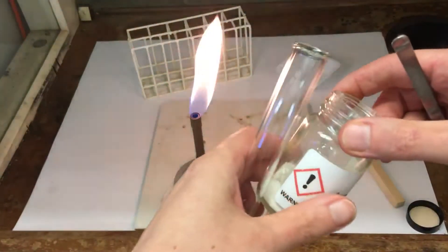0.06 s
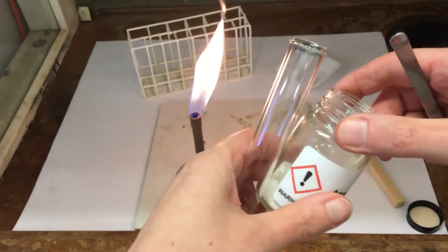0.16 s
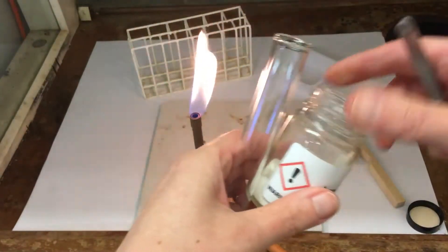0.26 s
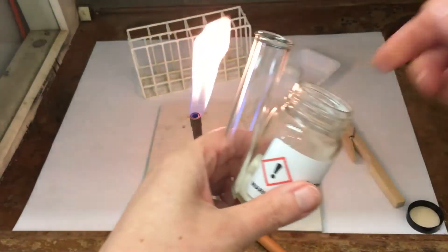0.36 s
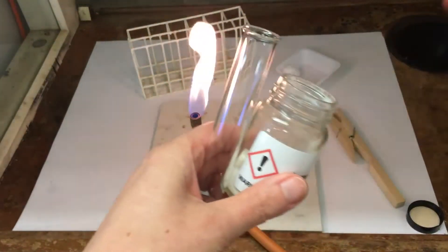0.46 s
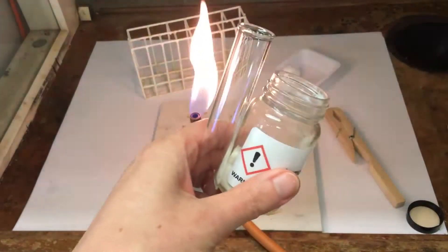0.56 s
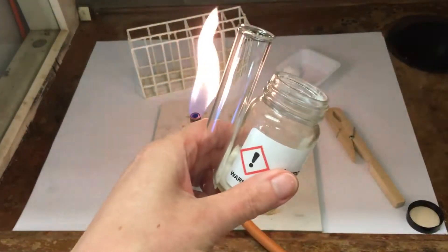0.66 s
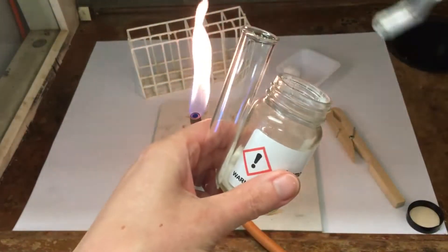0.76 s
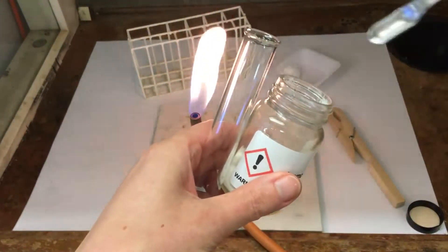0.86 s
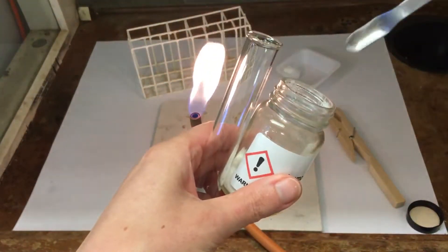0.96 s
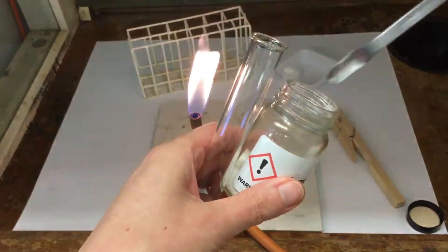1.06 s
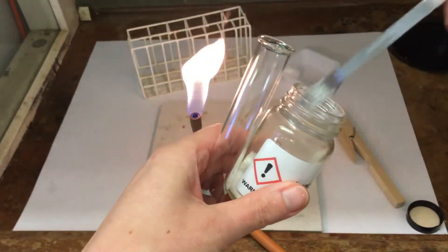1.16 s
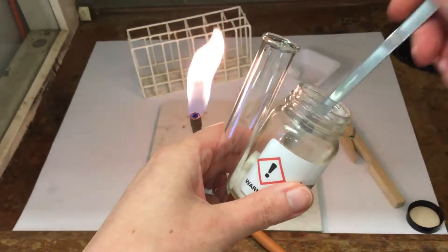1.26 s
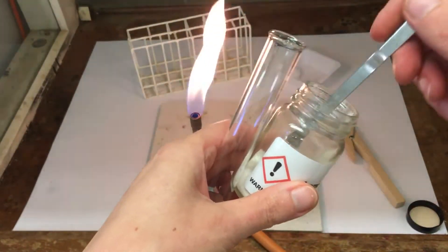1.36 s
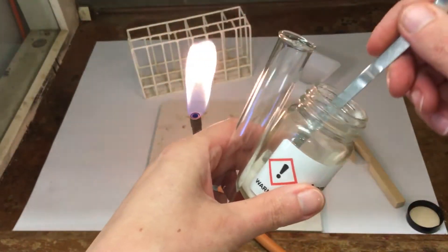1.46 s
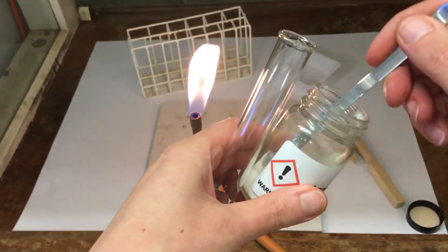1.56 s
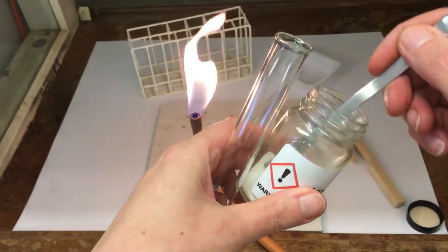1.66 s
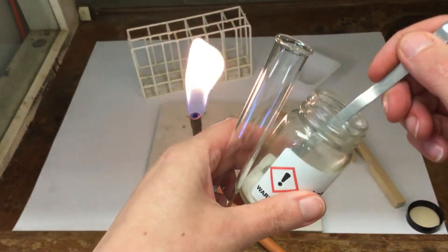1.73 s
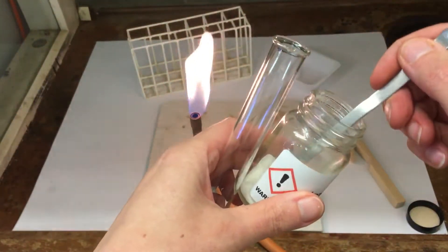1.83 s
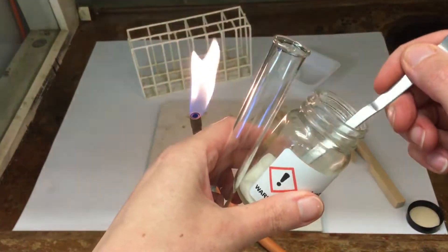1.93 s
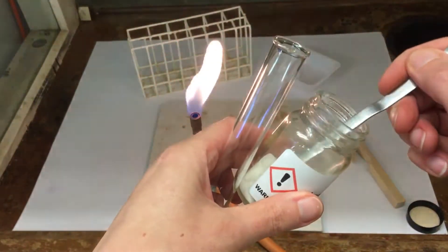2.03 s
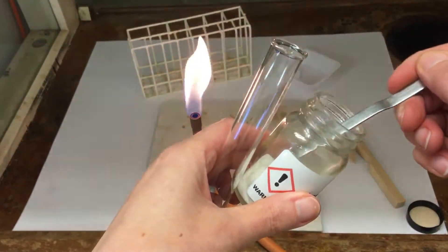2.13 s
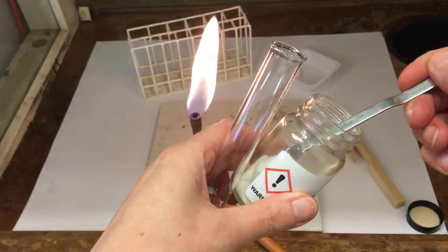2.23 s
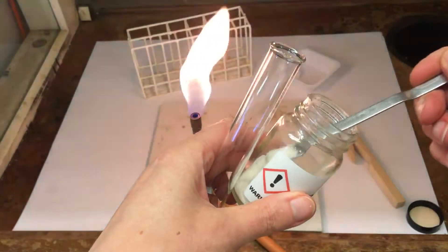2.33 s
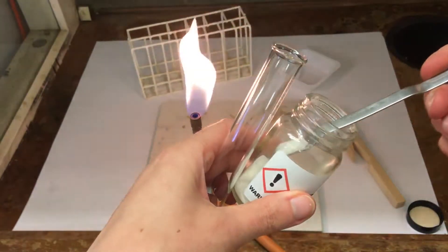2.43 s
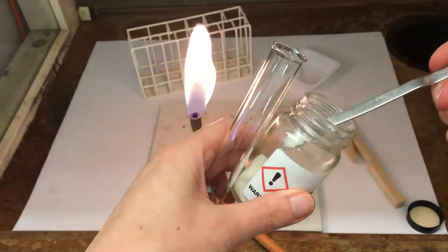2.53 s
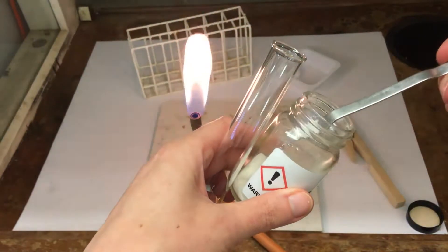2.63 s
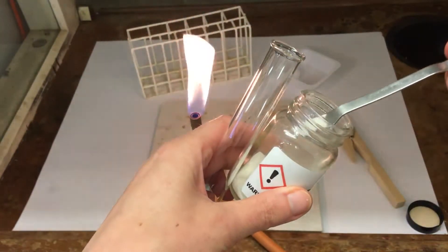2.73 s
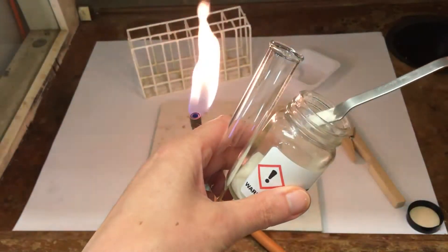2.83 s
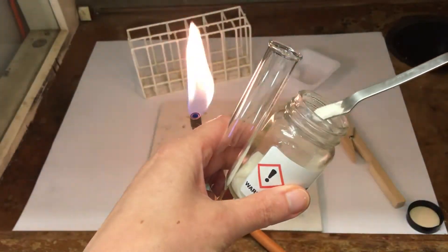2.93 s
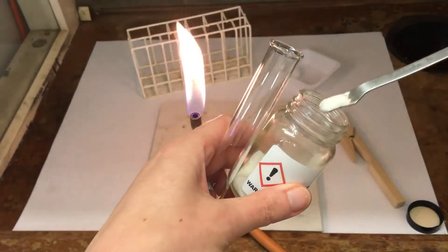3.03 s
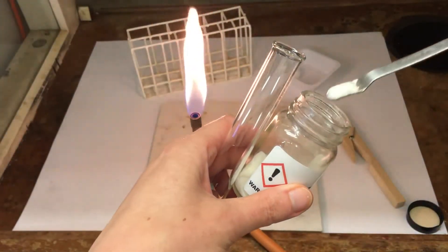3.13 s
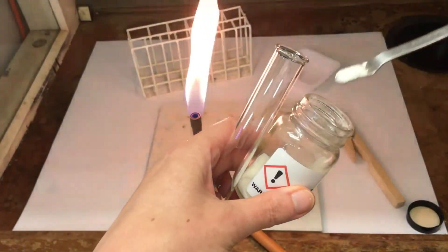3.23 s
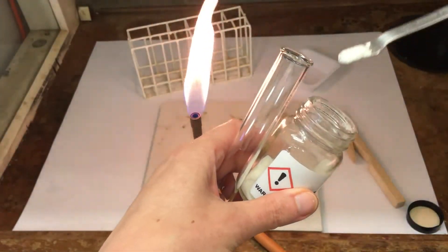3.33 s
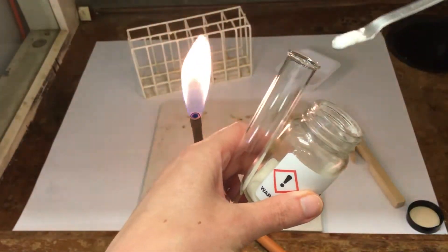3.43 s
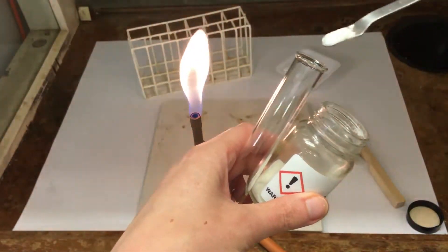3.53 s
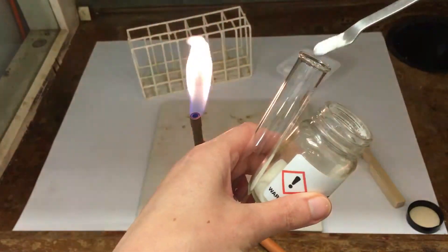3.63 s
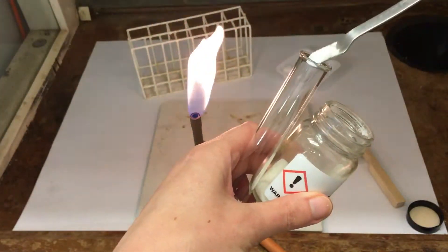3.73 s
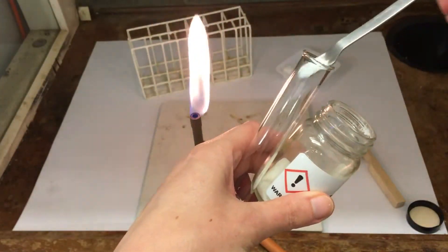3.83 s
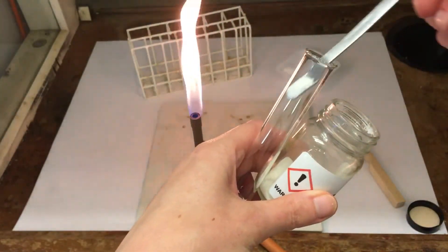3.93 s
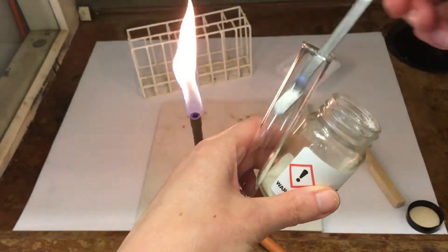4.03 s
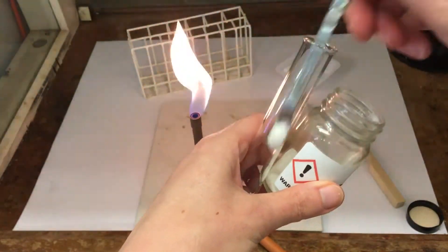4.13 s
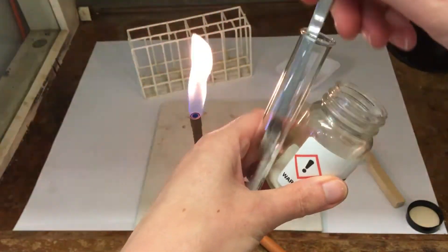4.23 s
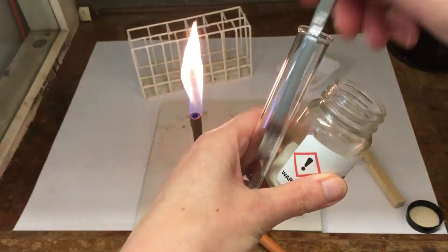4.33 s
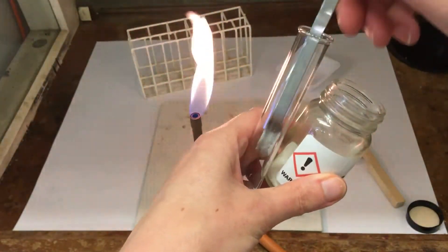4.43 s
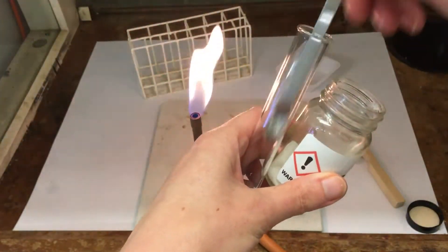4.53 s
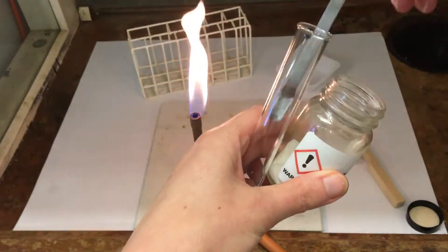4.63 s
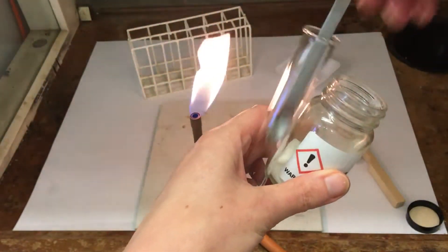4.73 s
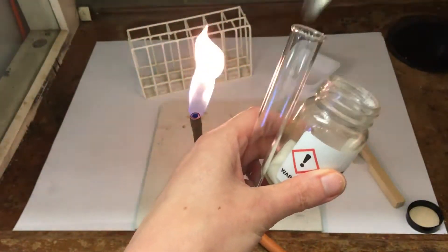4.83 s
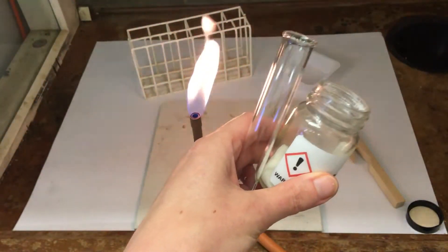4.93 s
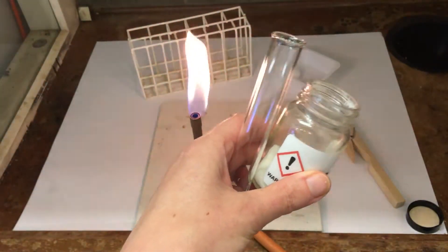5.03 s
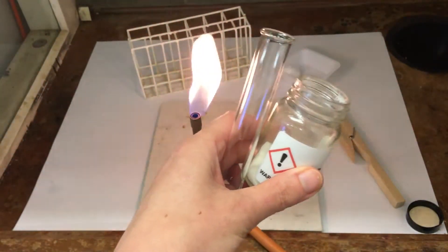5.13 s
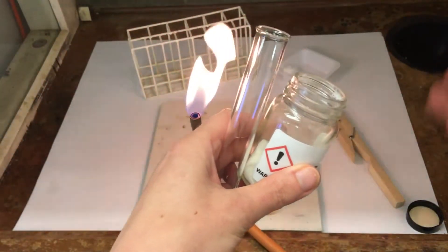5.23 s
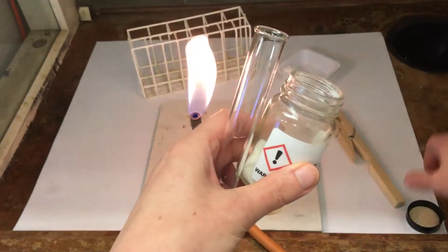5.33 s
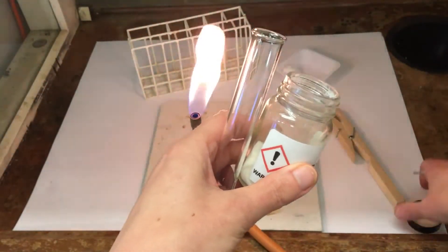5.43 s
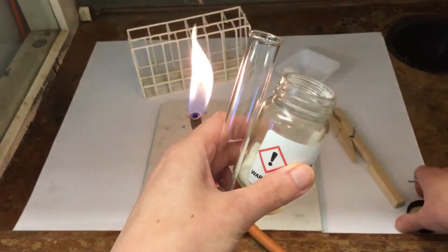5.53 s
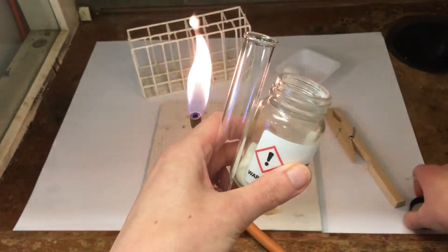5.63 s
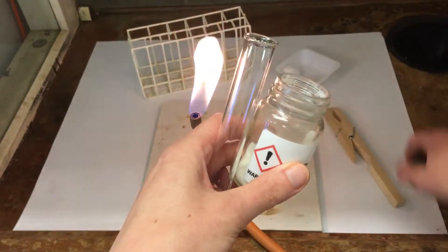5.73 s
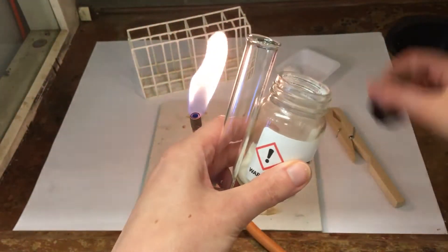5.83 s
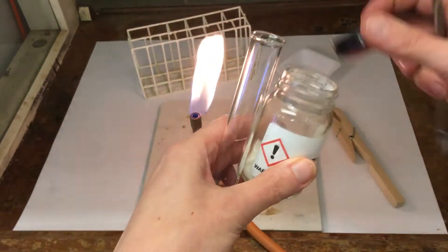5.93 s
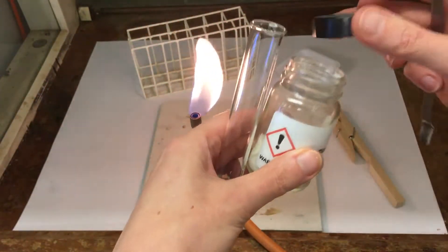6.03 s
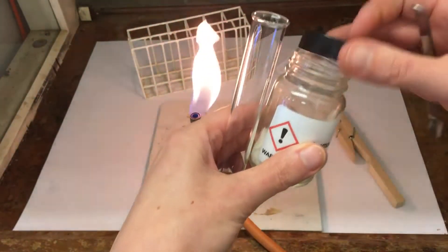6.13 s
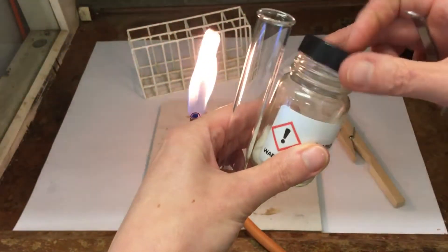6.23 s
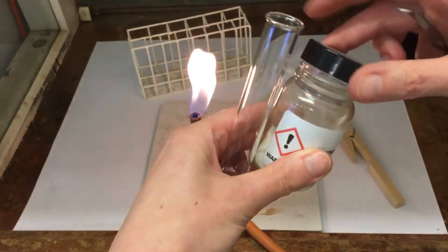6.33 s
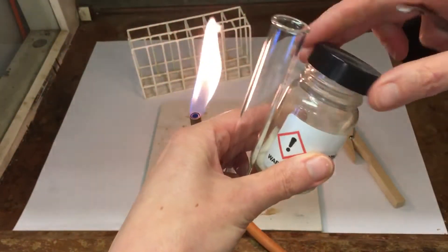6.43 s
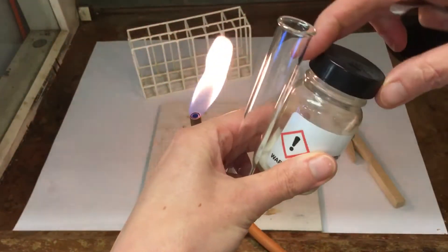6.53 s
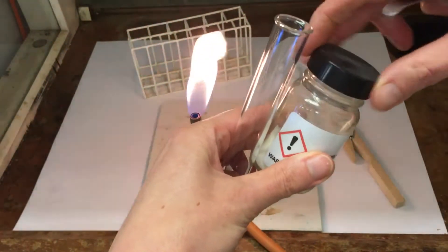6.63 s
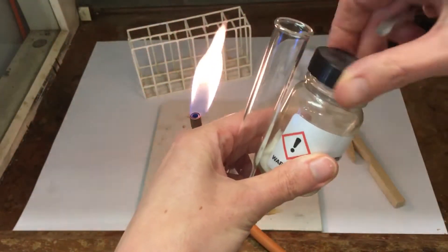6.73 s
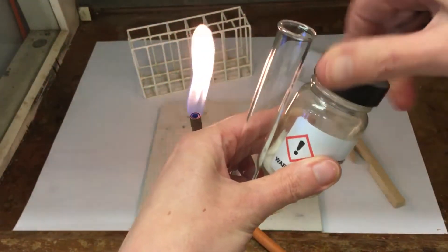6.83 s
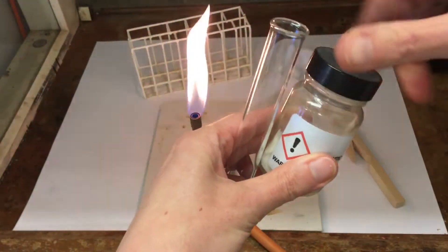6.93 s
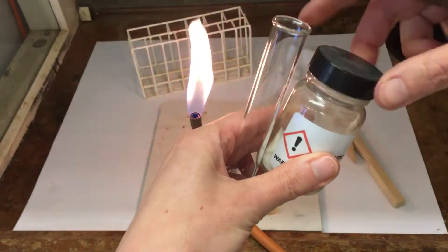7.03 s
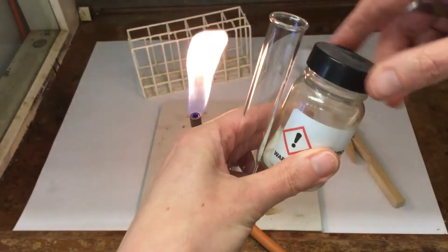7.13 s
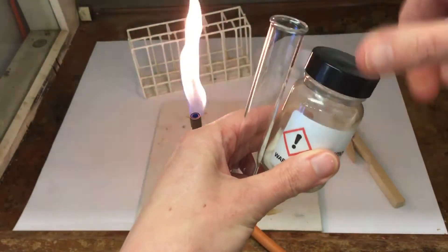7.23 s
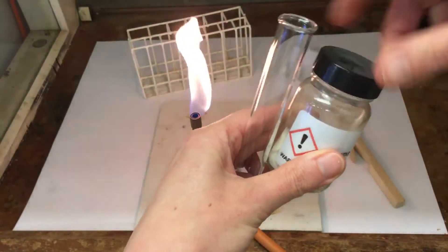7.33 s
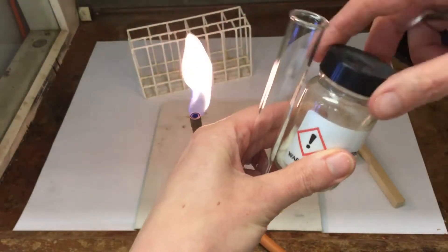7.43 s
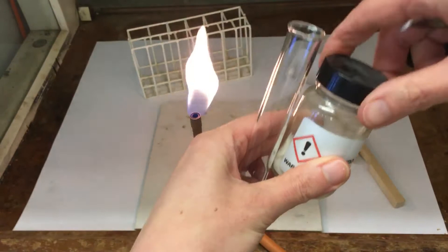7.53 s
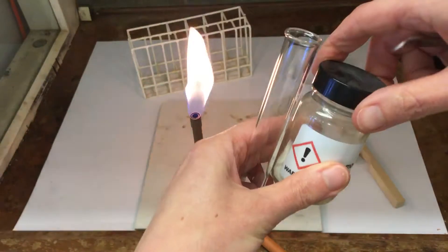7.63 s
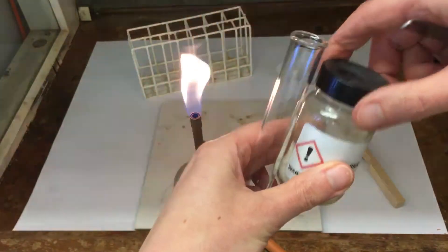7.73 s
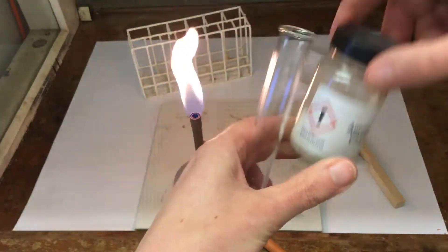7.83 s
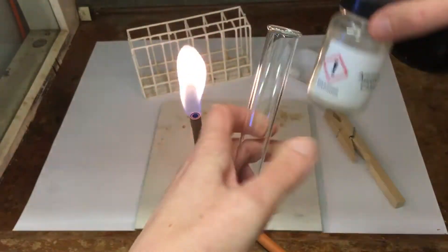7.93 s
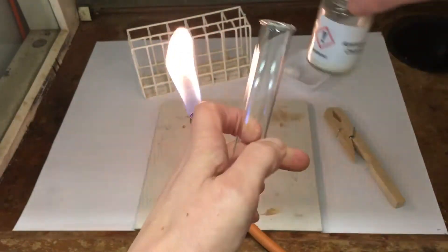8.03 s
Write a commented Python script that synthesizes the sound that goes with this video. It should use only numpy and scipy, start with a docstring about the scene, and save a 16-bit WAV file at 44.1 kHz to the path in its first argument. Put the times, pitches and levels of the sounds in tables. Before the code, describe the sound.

Close by, a metal spatula clinks once on glass, then scratches softly through powder in a jar. A pause leads to the loudest part, about a second of quick, ringing taps inside a glass test tube. Afterwards a plastic lid lands on the jar with a clack, then clicks and rasps as it turns. The low rumble and hum of a laboratory extractor fan runs underneath throughout.

```python
"""Spatula, jar and lab fan

A fume-cupboard fan rumbles and hums in a laboratory. After one light clink, a steel spatula scrapes
powder in a glass jar, then taps it off inside a hand-held boiling tube, making the glass ring.
A plastic lid is picked up and screwed onto the jar, knocking and rasping as it turns."""
import sys
import numpy as np
from scipy import signal
from scipy.fft import rfft, irfft, next_fast_len
from scipy.io import wavfile

SR = 44100
rng = np.random.default_rng(int(sys.argv[2]) if len(sys.argv) > 2 else 0)


def pcm_store(signal):
    """Save signal as 16-bit PCM."""
    levels = np.round(np.clip(np.atleast_2d(signal), -1, 1) * 32767)
    wavfile.write(sys.argv[1], SR, levels.astype(np.int16).T)


N = 355754
T = np.arange(N) / SR
SHORT_T = T[:SR // 3]   # the clock for one short sound [s]


def amp(db):
    """Turn decibels into a number to multiply by."""
    return 10 ** (np.asarray(db) / 20)


def rms_one(x):
    """Scale the average strength (rms) to 1."""
    return x / np.sqrt(np.mean(x ** 2) + 1e-20)


def start_one(sound):
    """Scale the average strength of the first 10 ms to 1."""
    return sound / np.sqrt(np.mean(sound[:SR // 100] ** 2))


def peak_one(sound):
    return sound / np.abs(sound).max()


def add(out, start_s, sound):
    at = round(start_s * SR)
    out[at:at + len(sound)] += sound[:N - at]


def band(x, low_hz, high_hz):
    """Turn down everything outside a range of pitches."""
    edges = [low_hz, min(high_hz, .45 * SR)]
    return signal.sosfilt(signal.butter(2, edges, "band", fs=SR, output="sos"), x)


def coloured(x, outline, bumps):
    """Shape the bass and treble with a broad outline plus rounded peaks and dips."""
    size = next_fast_len(N)
    hz = np.arange(1, size // 2 + 2) * SR / size
    outline_hz, outline_db = np.transpose(outline)
    db = np.interp(np.log(hz), np.log(outline_hz), outline_db)
    for centre_hz, width_hz, bump_db in bumps:
        db += bump_db * np.exp(-.5 * ((hz - centre_hz) / (.5 * width_hz)) ** 2)
    return irfft(rfft(x, size) * amp(db), size)[:N]


def waver(per_s):
    """A slow random drift, about 1 in size."""
    r = np.exp(-2 * np.pi * per_s / SR)
    return rms_one(signal.lfilter([1], [1, -2 * r, r * r], rng.standard_normal(N + SR))[SR:])


def strike(notes):
    """One hit rings an object's own notes, a bit differently each time. Each fades 60 dB in t60 s."""
    hz, db, t60 = np.transpose(notes)[:, :, None]
    strength, phase, detune = rng.standard_normal((3, len(notes), 1))
    onset = np.minimum(SHORT_T / .0004, 1)   # contact lasts 0.4 ms
    height = amp(db + 3 * strength - 60 * SHORT_T / t60) * onset
    gripped_hz = hz * (1 + .004 * detune)   # the grip shifts each pitch slightly
    return np.sum(height * np.sin(2 * np.pi * gripped_hz * SHORT_T + .6 * phase), axis=0)


def crack(low_hz, high_hz, t60):
    """A quick burst of noise as two things touch."""
    return band(rng.standard_normal(len(SHORT_T)) * amp(-60 * SHORT_T / t60), low_hz, high_hz)


def grains(per_s, spread_db):
    """Random clicks of uneven size."""
    sizes = amp(spread_db * np.minimum(rng.exponential(1, N), 5)) * rng.choice([-1, 1], N)
    return sizes * (rng.random(N) < per_s / SR)


def ring(clicks, notes):
    """Every click sets an object's own notes ringing."""
    out = 0
    for hz, db, t60 in notes:
        r, w = amp(-60 / (t60 * SR)), 2 * np.pi * hz / SR
        out = out + amp(db) * signal.lfilter([0, np.sin(w)], [1, -2 * r * np.cos(w), r * r], clicks + 1e-18)
    return out


def strokes(rows, column, rise, fall):
    """Each stroke rises to the level in the given column, holds, then falls. Slopes are in dB/s."""
    db = np.full(N, -200.)
    for row in rows:
        before_s = np.maximum(row[0] - T, 0)
        after_s = np.maximum(T - row[0] - abs(row[1]), 0)
        db = np.maximum(db, row[column] - rise * before_s - fall * after_s)
    return amp(db)


# The rush of air, from bass to treble: (pitch [Hz], level [dB per Hz])
AIR_OUTLINE = [(28, -84), (37, -53), (70, -49), (220, -50.5), (238, -64), (760, -70), (830, -79.5),
               (2200, -89), (2900, -95), (4200, -95), (5000, -100), (10300, -111), (14700, -116),
               (15650, -104), (15850, -127)]
# Pitches the duct and cupboard boost or cancel, plus a shallow dip near 4.9 kHz: (pitch [Hz], width [Hz], boost
# [dB])
DUCT_BUMPS = [(41.5, 5, 10), (55, 6, -5), (156, 14, -10), (175, 10, 3), (206, 14, 5), (281, 9, -7),
              (336, 26, 7), (396, 18, -13), (418, 14, 4), (450, 8, -13), (483, 10, -5), (545, 50, 4),
              (615, 45, -7), (650, 8, -6), (672, 22, 4), (693, 10, -6), (720, 25, 3), (800, 20, -8),
              (858, 22, -11), (908, 16, -6), (990, 50, 8), (1410, 70, -5), (1640, 90, 8.5), (1760, 40, -5),
              (1845, 40, -4), (4900, 300, -3)]
def fan_air():
    """Rushing air, shaped by waves bouncing inside the duct and cupboard."""
    return coloured(rng.standard_normal(N), AIR_OUTLINE, DUCT_BUMPS) * np.sqrt(SR / 4)


# Chance swells and dips in the low rumble near 97 Hz: (time [s], level [dB])
CHANCE_SWELLS = [(0.0, -18.5), (0.13, -25), (0.45, -27), (0.52, -37), (0.58, -21), (0.76, -29),
                 (1.12, -26.5), (1.17, -36), (1.37, -23), (2.47, -28.5), (2.54, -18), (2.65, -31),
                 (3.23, -22.5), (3.28, -34.5), (3.68, -23), (3.89, -36), (4.54, -22), (4.6, -39.5),
                 (4.76, -23.5), (5.57, -33.5), (5.66, -21), (5.75, -29), (7.26, -24.5), (7.73, -30),
                 (7.8, -20.5), (8.07, -34)]
def low_rumble():
    """The strongest of the bouncing waves is a low rumble that swells and dips by chance."""
    rumble_hz, wander_hz = 97.5, 8
    narrow = band(rng.standard_normal(N + SR), rumble_hz - wander_hz, rumble_hz + wander_hz)
    phase = np.angle(signal.hilbert(narrow, next_fast_len(N + SR)))
    tone = np.cos(phase)[SR:SR + N]   # wandering pitch, even strength
    level_db = np.interp(T, *np.transpose(CHANCE_SWELLS)) + 3 * waver(per_s=8)
    return band(tone, 78, 110) * np.sqrt(2) * amp(level_db)


# Motor tones; 22 per turn is the blade or slot rate:
# (cycles per turn [count], cycles per magnetic pull [count], level [dB])
MOTOR_TONES = [(1, 0, -64), (5, 0, -51), (6, 0, -49), (7, 0, -37), (11, 0, -61), (12, 0, -58), (18, 0, -66),
               (0, 2, -32.5), (0, 3, -64), (0, 5, -62), (0, 6, -71), (0, 7, -68), (0, 10, -65),
               (22, 0, -47), (22, 1, -58), (22, 2, -61), (22, 4, -73)]
def motor_hum():
    """The spinning shaft and the pulsing magnetic pull make steady tones."""
    shaft_hz, magnet_hz = 24.615, 100.17
    out = np.zeros(N)
    for per_turn, per_pull, db in MOTOR_TONES:
        hz = per_turn * shaft_hz + per_pull * magnet_hz
        out += amp(db) * np.sqrt(2) * np.sin(2 * np.pi * hz * T + rng.uniform(0, 2 * np.pi))
    return out


# Notes of the tube wall, split and muffled by the hand: (pitch [Hz], level [dB], fade time [s])
WALL_NOTES = [(4580, 0, .036), (4655, -3, .034), (4790, -10, .02), (5350, -7, .006), (4610, -23, .17),
              (4520, -24, .1)]
# The tube's high notes: (pitch [Hz], level [dB], fade time [s])
HIGH_NOTES = [(11090, -7, .05), (11240, 0, .06), (11400, -2, .05), (11500, 0, .07), (11600, -4, .09),
              (11880, -6, .05), (12200, -9, .04), (12400, -5, .05), (12600, -6, .07), (12950, -7, .04),
              (13590, -9, .035), (14000, -8, .035), (14200, -6, .045), (14400, -7, .04), (14750, -11, .03)]
# Glass or steel hitting glass: (time [s], wall level [dB], high notes level [dB], crack level [dB])
TUBE_TAPS = [(0.0262, -27, -48.5, -52), (3.7761, -21, -45, -43), (3.7881, -26, -56, -62),
             (3.812, -34.5, -57, -66), (3.8312, -40, -61, -73), (3.899, -51, -78, -84),
             (3.9165, -40, -65, -72), (3.9814, -66, -70, -86), (3.9994, -63, -70, -86),
             (4.0801, -18.5, -35.5, -32.5), (4.0956, -30, -65, -47), (4.1266, -18.5, -36, -33),
             (4.1864, -33, -56.5, -65), (4.2017, -30.5, -55, -56), (4.2343, -20, -42, -36.5),
             (4.2767, -40, -73, -62), (4.2984, -28.5, -48, -53), (4.3012, -27, -62.5, -46),
             (4.324, -16, -25, -35), (4.373, -11, -21, -31), (4.434, -10.5, -22.5, -27),
             (4.4925, -9.5, -27, -44), (4.512, -16.5, -41.5, -31.5), (4.569, -20, -30.5, -33),
             (4.5766, -18.5, -24.5, -35), (4.6203, -14, -30, -41), (4.635, -19, -22.5, -34),
             (4.6578, -19, -54.5, -45.5), (4.6848, -30, -50, -55.5), (4.6949, -22.5, -41, -49),
             (4.711, -18.5, -36.5, -42), (4.74, -40, -42, -51)]
def tube_taps():
    """Each tap rings the glass tube and adds a steel clank and a bright crack."""
    out = np.zeros(N)
    settle = amp(-60 * SHORT_T / .03) + amp(-5)   # the resting spatula quickly quiets the high notes
    for start_s, wall_db, high_db, crack_db in TUBE_TAPS:
        pitch, strength = rng.standard_normal(2)
        clank_hz = 3400 * 2 ** (.3 * pitch)
        clank_db = wall_db - 26.5 + 2.5 * strength
        add(out, start_s, amp(wall_db) * peak_one(strike(WALL_NOTES)))
        add(out, start_s, amp(high_db) * start_one(strike(HIGH_NOTES) * settle))
        add(out, start_s, amp(clank_db) * start_one(crack(.44 * clank_hz, 1.27 * clank_hz, t60=.031)))
        add(out, start_s, amp(crack_db) * start_one(crack(5200, 16500, t60=.016)))
        add(out, start_s, amp(crack_db - 6.5) * start_one(crack(7000, 16500, t60=.004)))   # first touch
    return out


# The glass jar's notes: (pitch [Hz], level [dB], fade time [s])
JAR_NOTES = [(7580, -4, .05), (7690, -5, .05), (7775, 0, .07), (8900, -15, .03), (9800, -11, .04),
             (10150, -12, .04), (11500, -8, .05), (11800, -9, .05), (12400, -12, .05), (14100, -13, .04)]
# The spatula blade's notes: (pitch [Hz], level [dB], fade time [s])
BLADE_NOTES = [(2270, 0, 0.0098), (2450, -5, 0.026), (2580, -2, 0.05)]
# Scrapes through the powder: (time [s], hold [s], jar level [dB], blade level [dB])
SCRAPES = [(2.01, .003, -57, -53), (2.042, .003, -56.5, -59), (2.1, .003, -48.5, -47.5),
           (2.13, 0.081, -65, -58.5), (2.236, .003, -63, -67), (2.286, .04, -73, -64)]
# The spatula tip catching on the jar: (time [s], level [dB])
TIP_CATCHES = [(1.8177, -43.5), (1.9989, -47), (2.0318, -51), (2.0707, -50), (2.0837, -52), (2.0956, -51),
               (2.149, -41.5), (2.1834, -46), (2.2318, -58), (2.2867, -66)]
def scoop():
    """Grinding grains ring the jar and the blade, and the tip clicks where it catches."""
    muffle_hz = 10400   # powder softens the contact with the jar
    grit = grains(2000, spread_db=-1.5)
    on_jar = strokes(SCRAPES, column=2, rise=601, fall=550)
    on_blade = strokes(SCRAPES, column=3, rise=601, fall=550)
    out = rms_one(ring(band(grit, 3000, muffle_hz), JAR_NOTES)) * on_jar
    out += rms_one(ring(grit, BLADE_NOTES)) * on_blade
    out += amp(-19) * rms_one(band(grit, 9000, 17000)) * on_jar   # powder hiss
    for start_s, db in TIP_CATCHES:
        clink = peak_one(band(strike(JAR_NOTES), 3000, muffle_hz))
        click = peak_one(crack(6500, 15500, t60=.012))
        add(out, start_s, amp(db) * peak_one(clink + .42 * click))
    return out


# Light touches on the bench: (time [s], hold [s], level [dB])
BENCH_BRUSHES = [(5.506, 0.055, -61), (5.848, .005, -68)]
def bench_brush():
    """Fingers and lid brush the bench with a faint hiss."""
    hiss = rms_one(band(grains(9000, spread_db=3), 5000, 20000))
    return hiss * strokes(BENCH_BRUSHES, column=2, rise=503.5, fall=395)


# The plastic lid's notes: (pitch [Hz], level [dB], fade time [s])
LID_NOTES = [(1300, -3, .015), (1700, -2, .02), (2150, 0, .03), (2750, -2, .018), (3250, -1, .022),
             (4100, -4, .014), (5400, -6, .01), (6250, -4, .016)]
# Lid knocks: (time [s], level [dB], ring pitch [Hz], tick [dB], hollow pitch [Hz], hollow level [dB])
LID_KNOCKS = [(6.0647, -16, 5600, -60, 1020, -35), (6.1137, -37, 2060, -42.5, 680, -32),
              (6.1971, -37.5, 2680, -54, 687, -37.5), (6.4033, -41, 6350, -38, 630, -34),
              (6.4148, -29, 4330, -42, 600, -42), (6.4368, -33, 4260, -52, 1580, -42.5),
              (6.572, -41, 2130, -58, 654, -44), (6.607, -44, 2000, -54, 1690, -43.5),
              (6.6147, -34.5, 3670, -62, 640, -58), (6.6788, -50, 2040, -65, 600, -60),
              (6.6947, -34, 2220, -51, 660, -54), (6.732, -40, 2940, -68, 630, -68),
              (6.8522, -34, 6060, -49, 760, -45), (6.9968, -31, 2120, -46, 1060, -49),
              (7.004, -44, 6400, -31.5, 1310, -36.5), (7.0244, -38, 2600, -55, 600, -47),
              (7.048, -29.5, 3630, -41.5, 670, -60), (7.114, -30, 2380, -45, 600, -51),
              (7.133, -38, 6400, -34.5, 670, -35), (7.2136, -35, 2390, -51, 670, -45),
              (7.4008, -44, 3200, -70, 640, -58)]
def lid_knocks():
    """The stiff lid bumps the rim and thread, ringing the plastic, the jar and the air shut inside."""
    out = np.zeros(N)
    for start_s, db, ring_hz, tick_db, hollow_hz, hollow_db in LID_KNOCKS:
        nearby_notes = [(hz, note_db - 2.5 * np.log2(hz / ring_hz) ** 2, t60)
                        for hz, note_db, t60 in LID_NOTES]   # weaker away from the ring pitch
        clack = peak_one(crack(.84 * ring_hz, 1.18 * ring_hz, t60=.03))
        plastic = peak_one(strike(nearby_notes))
        tick = start_one(crack(3450, 11000, t60=.027))
        hollow = start_one(crack(.26 * hollow_hz, 1.22 * hollow_hz, t60=.034))
        glass = amp(-5.5) * start_one(strike(JAR_NOTES))
        add(out, start_s, amp(db) * peak_one(clack + .69 * plastic))
        add(out, start_s, amp(tick_db) * (tick + glass) + amp(hollow_db) * hollow)
    return out


# The first knock's short 3 kHz after-ring, then rasps as the lid turns:
# (time [s], hold [s], rasp [dB], rasp pitch [Hz], fine rub [dB], jar ring [dB])
LID_RASPS = [(6.068, 0.0049, -36, 3320, -60, -60), (6.125, .003, -50, 1840, -53, -63),
             (6.196, .003, -53, 1960, -51, -68), (6.31, 0.012, -52.5, 1720, -70, -71),
             (6.401, 0.031, -55, 2140, -59, -54), (6.571, 0.029, -44, 1610, -57, -66),
             (6.618, .015, -49, 1690, -61, -64), (6.64, 0.044, -49.5, 2230, -58.5, -68),
             (6.791, 0.028, -49.5, 2900, -56, -63), (6.834, 0.017, -49.5, 2960, -54, -49),
             (7.017, .004, -48, 2140, -47, -55), (7.038, 0.027, -45, 2200, -50, -62),
             (7.118, 0.01, -39.5, 2230, -58, -54), (7.134, .003, -45, 2250, -44, -38),
             (7.19, 0.024, -55, 1700, -55, -63), (7.36, 0.042, -70, 1700, -71, -73)]
def lid_rasps():
    """The first knock rings on briefly; then tiny slips of the turning thread ring lid and jar."""
    grip_share = .4   # fingers shorten the lid's ring to this share
    slips = grains(3000, spread_db=3.2)
    rub = band(grains(6000, spread_db=4), 3500, 9900)
    rows = np.array(LID_RASPS)
    current = np.maximum(np.searchsorted(rows[:, 0], T + .01) - 1, 0)
    rasp_hz = rows[current, 3]
    rasp = np.zeros(N)
    for hz, db, t60 in LID_NOTES:   # the contact point favours notes near the rasp pitch
        rasp += ring(slips, [(hz, db, grip_share * t60)]) * amp(-22 * np.log2(hz / rasp_hz) ** 2)
    out = rms_one(rasp) * strokes(LID_RASPS, column=2, rise=2500, fall=454)
    out += rms_one(rub) * strokes(LID_RASPS, column=4, rise=2500, fall=597)
    out += rms_one(ring(slips, JAR_NOTES)) * strokes(LID_RASPS, column=5, rise=2500, fall=597)
    return out


def cupboard_echo(x):
    """Close, hard walls send back a short blur of echoes."""
    delay_s, fade_s, echo_db = .003, .1, -9.5
    tail = rng.standard_normal(len(SHORT_T)) * amp(-60 * SHORT_T / fade_s) * (SHORT_T > delay_s)
    return amp(echo_db) * signal.fftconvolve(x, tail / np.sqrt(np.sum(tail ** 2)))[:N]


def scene():
    """The work of the hands and its echo, over the running fan."""
    hands = tube_taps() + scoop() + bench_brush() + lid_knocks() + lid_rasps()
    return (hands + cupboard_echo(hands) + fan_air() + low_rumble() + motor_hum())[None]


# How well the microphone hears each pitch: (pitch [Hz], level [dB])
MIC_OUTLINE = [(100, 0), (14700, 0), (15900, -16), (20000, -16)]
# Peaks and dips caused by its case: (pitch [Hz], width [Hz], boost [dB])
MIC_BUMPS = [(6100, 840, 4), (7270, 1500, -1.5), (10170, 1100, -4), (13300, 2800, -2)]
def record(dry):
    """The microphone colours and fades the treble, then the very top is cut off."""
    cutoff_hz = 17250
    heard = coloured(dry[0], MIC_OUTLINE, MIC_BUMPS)[None]
    return signal.sosfilt(signal.cheby2(12, 70, cutoff_hz, fs=SR, output="sos"), heard)


dry = scene()
out = record(dry)
pcm_store(out)
```